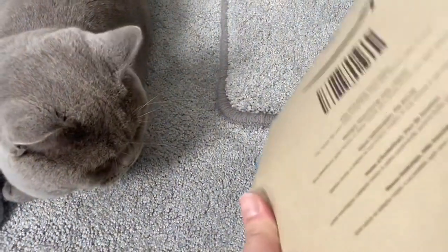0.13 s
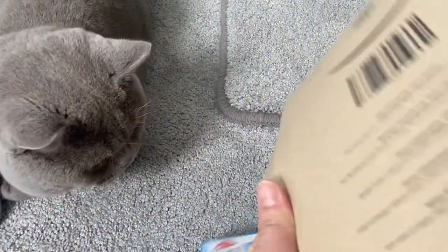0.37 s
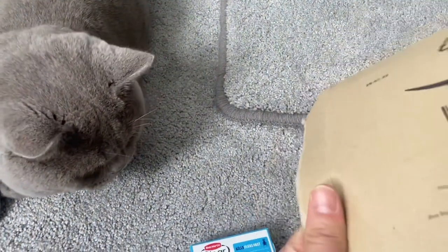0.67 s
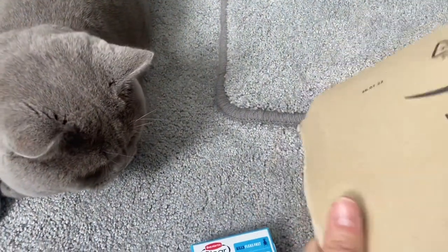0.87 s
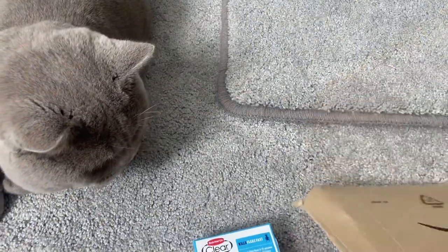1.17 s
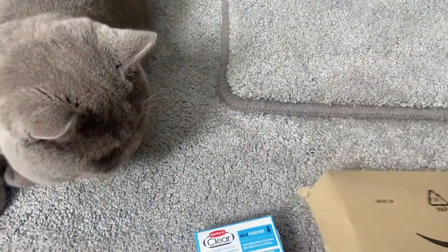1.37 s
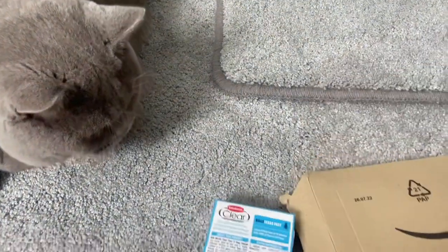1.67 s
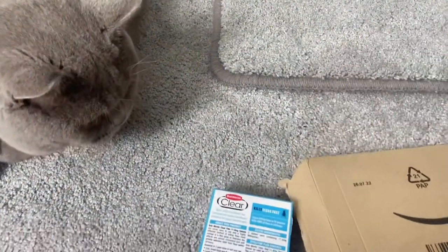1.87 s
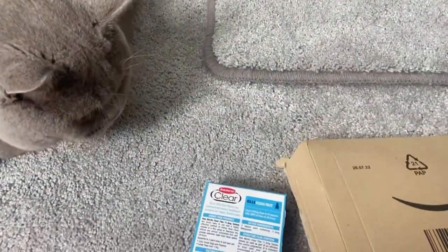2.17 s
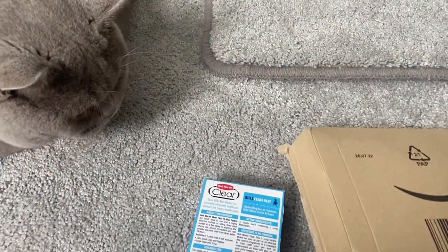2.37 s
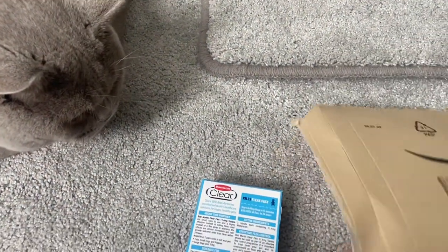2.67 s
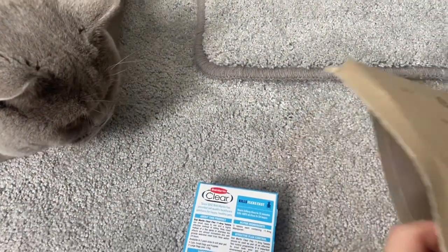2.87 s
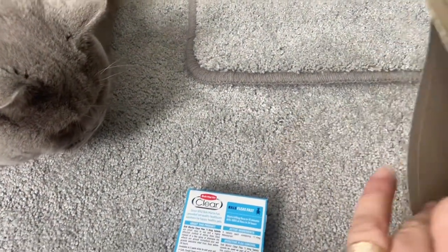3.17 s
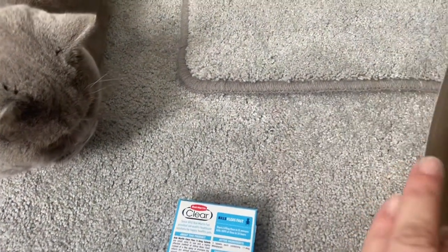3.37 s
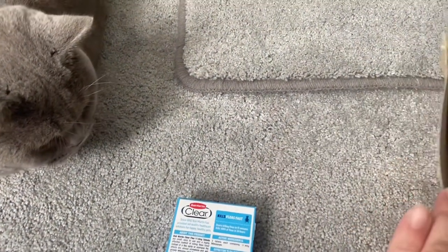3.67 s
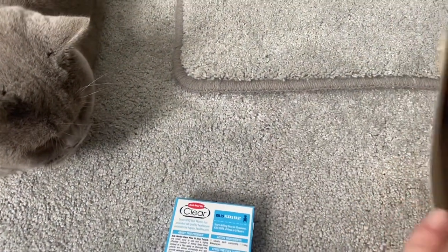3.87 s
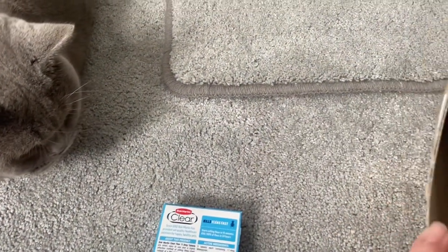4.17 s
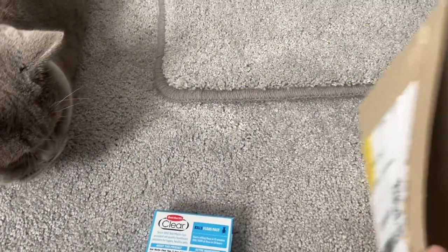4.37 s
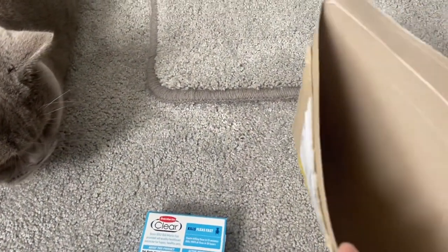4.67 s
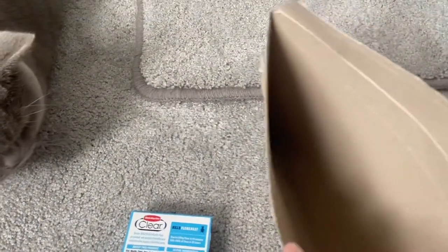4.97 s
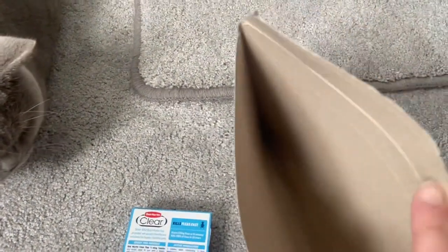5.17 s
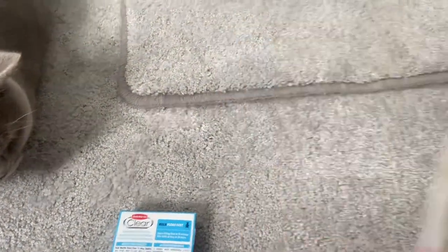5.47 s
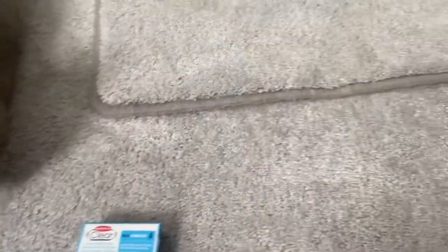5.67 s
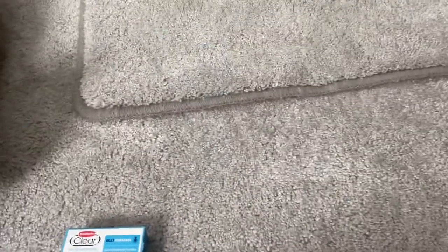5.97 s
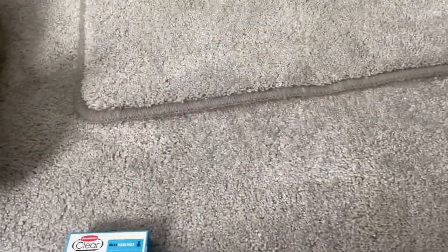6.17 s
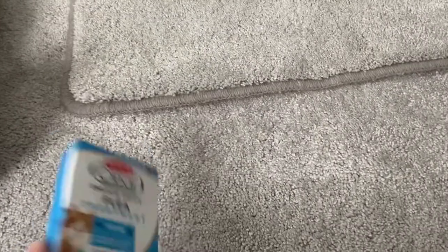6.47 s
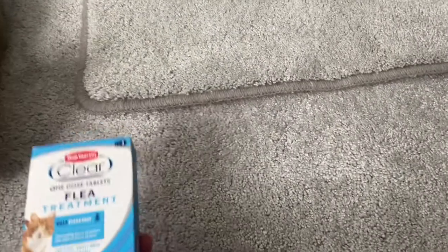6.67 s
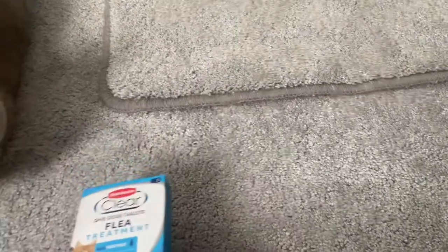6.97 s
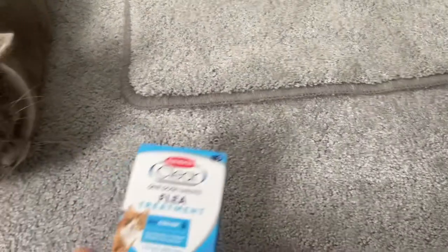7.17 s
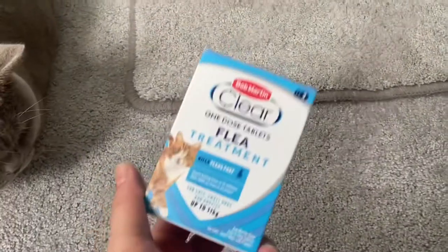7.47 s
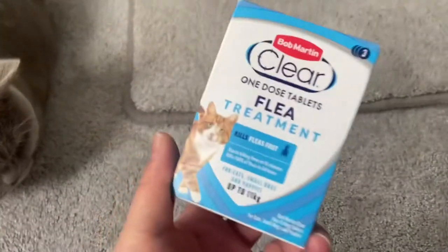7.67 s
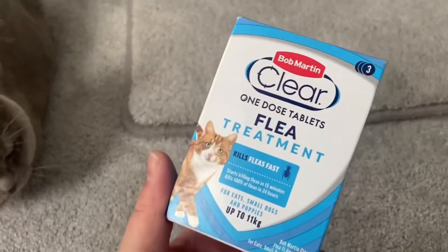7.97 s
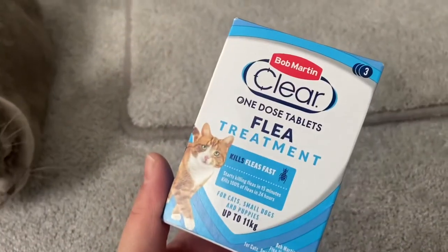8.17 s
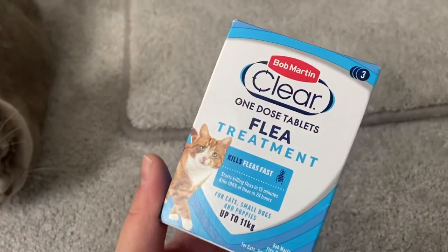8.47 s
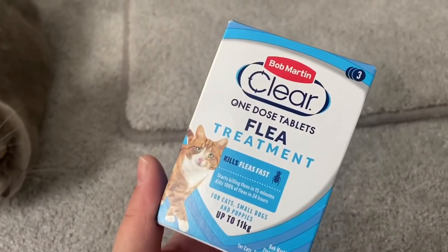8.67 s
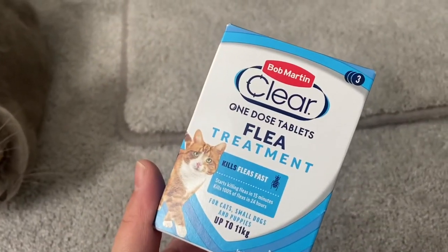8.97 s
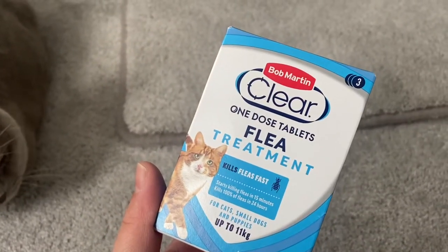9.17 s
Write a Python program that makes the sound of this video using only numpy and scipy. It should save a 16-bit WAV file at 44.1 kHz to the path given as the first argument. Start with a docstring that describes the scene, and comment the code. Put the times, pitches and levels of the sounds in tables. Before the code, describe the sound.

A stiff paper mailer buckles and rustles close by, slides over carpet and lands with a thud, then a small cardboard box is tapped and turned.

```python
"""Quiet, carpeted room: a stiff paper mailer is flexed open close by, slid over carpet, put down with a thud;
then a small cardboard box is picked up and turned in the fingers.
Buckling and taps: clusters of snaps through resonances, plus a bright crack. Rubbing: coloured noise
for hollow body, surface and fibres. Thumps: sagging sines with a dull puff. Behind: low flutter, still air, short tail."""
import sys
import numpy as np
from scipy import signal
from scipy.fft import rfft, irfft, next_fast_len
from scipy.io import wavfile
from scipy.ndimage import uniform_filter1d, map_coordinates

SR = 44100
rng = np.random.default_rng(int(sys.argv[2]) if len(sys.argv) > 2 else 0)


def dump(signal):
    """Clip the signal to [-1, 1] and save it as 16-bit WAV at the path in sys.argv[1]."""
    limited = np.clip(np.atleast_2d(signal).T, -1, 1)
    pcm = np.round(limited * 32767).astype(np.int16)
    wavfile.write(sys.argv[1], SR, pcm)


N = 410994
T = np.arange(N) / SR
BOX_FROM_S = 6.1  # the hand leaves the mailer for the box


def amp(db):
    """Decibels to gain."""
    return 10 ** (np.asarray(db) / 20)


def unit(x):
    """Scaled to rms 1."""
    return x / np.sqrt(np.mean(x ** 2) + 1e-20)


def along(points, hz):
    """(Hz, value) points joined on a log frequency axis."""
    f, v = np.transpose(points)
    return np.interp(np.log(hz + 1), np.log(f + 1), v)


def wobble(rate_hz):
    """Smooth random curve with rate_hz knots a second."""
    knots = rng.standard_normal(int(N * rate_hz / SR) + 4)
    t = np.arange(0, T[-1] + 1 / rate_hz, 1 / (8 * rate_hz))
    return np.interp(T, t, map_coordinates(knots, [t * rate_hz]))


def filtered(x, response):
    """x times a complex response of frequency."""
    n = x.shape[-1]
    m = 2 * next_fast_len(n // 2 + 2048)
    return irfft(rfft(x, m) * response(np.fft.rfftfreq(m, 1 / SR)), m)[..., :n]


def coloured(x, spectrum):
    """x through the minimum-phase filter with this spectrum."""
    def response(hz):
        cepstrum = irfft(np.log(amp(along(spectrum, hz))))
        cepstrum[1:len(hz) - 1] *= 2  # fold onto positive time
        cepstrum[len(hz):] = 0
        return np.exp(rfft(cepstrum))
    return filtered(x, response)


def rung(x, modes, stretch):
    """x through resonances scaled in frequency by stretch; paper damps what lies far above them."""
    damping_hz = 5070

    def response(f):
        total = 0
        for k, (hz, width_hz, db) in enumerate(modes):
            damped = 1j * f * width_hz
            total = total + (-1) ** k * amp(db) * damped / ((hz * stretch) ** 2 - f * f + damped)
        return total / (1 + 1j * f / damping_hz) ** 2
    return filtered(x, response)


def stereo(pair, side_db):
    """Two unrelated signals as middle and side."""
    side = amp(side_db) * pair[1]
    return np.array([pair[0] + side, pair[0] - side]) / np.hypot(1, amp(side_db))


def add(track, s, sound):
    """Mix a sound in at time s."""
    part = track[:, max(0, round(s * SR)):][:, :sound.shape[-1]]
    part += sound[..., :part.shape[-1]]


def friction(spectrum, side_db, grain_db, patchy_db, slip_rate_hz=900):
    """Countless slips of uneven size, as noise of drifting colour; stereo, rms 1."""
    standing_share = 1.1
    slips = rng.standard_normal((2, N)) * amp(grain_db * wobble(slip_rate_hz))
    z = signal.stft(slips, nperseg=1024)[2]
    drift = rng.standard_normal(z.shape[1:])
    drift = uniform_filter1d(uniform_filter1d(drift, size=4, axis=0), size=6, axis=1)
    standing = standing_share * rng.standard_normal((len(drift), 1))  # fine resonances that stay put
    patchy = z * amp(patchy_db * (unit(drift) + standing))
    pair = signal.istft(patchy, nperseg=1024)[1][:, :N]
    return unit(stereo(coloured(pair, spectrum), side_db))


def background(hollow):
    """Uneven low flutter of sheet and hands, growing with the hollow rubbing, over the room's still air."""
    # spectral density of the flutter: f/Hz, level/dB
    flutter_spectrum = [(25, -24.5), (45, 2.5), (120, -4), (260, -16.5), (450, -18.5), (900, -45),
                        (4000, -99.5)]
    # spectral density of the still air: f/Hz, level/dB
    air_spectrum = [(20, -17), (50, 3), (130, -10), (330, -15.5), (550, -11.5), (1000, -22.5),
                    (8000, -32.5), (15000, -43.5)]
    rest_db, handling_db, firm_db = -70, -52, -50.5  # handling_db: added flutter when hollow is at firm_db
    growth_db_per_db, smoothing_s = 0.43, 0.04
    effort = (hollow / amp(firm_db)) ** growth_db_per_db
    effort = np.abs(uniform_filter1d(effort, size=1 + int(smoothing_s * SR)))
    sway = np.hypot(amp(rest_db), amp(handling_db) * effort) * amp(1.2 * wobble(5))
    flutter = sway * friction(flutter_spectrum, side_db=-11, grain_db=1.4, patchy_db=1.2)
    air = coloured(rng.standard_normal((2, N)), air_spectrum)
    return flutter + amp(-75.5) * unit(stereo(air, side_db=-3.5))


def room(x):
    """Short, soft tail of the furnished room: decaying noise, 5 ms late."""
    # decay time: f/Hz, t60/s
    decay = [(700, 0.5), (3000, 0.13), (12000, 0.17)]
    hz, t, z = signal.stft(rng.standard_normal((2, SR // 2)), SR, nperseg=256)
    fading = z * amp(-60 * t / along(decay, hz)[:, None])
    tail = signal.istft(fading, SR, nperseg=256)[1]
    tail = np.pad(stereo(tail, side_db=-5), ((0, 0), (SR // 200, 0)))
    return signal.fftconvolve(x.mean(0)[None], tail / np.linalg.norm(tail[0]), axes=1)[:, :N]


def thumps(attack_s, dull_db):
    """Cushioned pushes: a few low cycles of sagging pitch and a dull puff around the final pitch."""
    # a wall flaps or something lands on the floor: t/s, level/dB ahead of the envelope, final pitch f/Hz
    pushes = [(0.054, -22.5, 124), (.11, -27.5, 125), (0.203, -24.5, 110.1), (.279, -24.5, 112.9),
              (0.907, -37, 106), (1.145, -32, 85.7), (1.283, -27, 68.4), (1.4, -39, 87.4), (2.886, -32, 70),
              (4.358, -36.5, 124.4), (5.033, -38.5, 120), (5.169, -32, 127.5), (5.392, -36, 110.3),
              (5.611, -37.5, 82.4), (5.763, -17.5, 84.1), (5.885, -37.5, 58), (6.523, -18, 86.2),
              (6.612, -33, 95)]
    t60_s, shudder_db, shudder_t60_s = 0.16, -26, 0.38  # a weak shudder outlasts each push
    sharp_share, sag_s = 1.3, 0.0061  # starts this share above its pitch; sag time constant
    track, t = np.zeros((2, N)), np.arange(SR // 3) / SR
    decay = amp(-60 * t / t60_s) + amp(shudder_db - 60 * t / shudder_t60_s)
    shape = decay * (1 - np.exp(-(t / attack_s) ** 2))
    sagging = t + sharp_share * sag_s * (1 - np.exp(-t / sag_s))
    for s, db, hz in pushes:
        noise = rng.standard_normal((2, len(t)))
        puff = filtered(noise, lambda f: (f / hz) ** 2 / (1 + (f / hz) ** 4))
        puff = amp(dull_db) * unit(stereo(puff, side_db=-3.5))
        add(track, s, amp(db) * shape * (np.sin(2 * np.pi * hz * sagging) + puff))
    return track


def snaps(t, length_s, after_db, count):
    """A first snap and the ever smaller ones it sets off within the given length."""
    train = np.zeros(len(t))
    train[0] = 1
    place = (np.arange(count) + rng.random(count)) / count
    sizes = amp(after_db - 1.5 * place) * rng.standard_normal(count)
    np.add.at(train, (place * min(length_s, t[-1]) * SR).astype(int), sizes)
    return train


def flurry(t60_s):
    """A dense, dying run of tiny pulses, energy 1."""
    t = np.arange(int(t60_s * SR)) / SR
    pulses = rng.standard_normal(len(t)) * amp(-60 * t / t60_s)
    return pulses[None] / np.linalg.norm(pulses)


def strikes(events, modes, edge, after_db, scatter_db, side_db, taut):
    """Snap clusters, scattered by the stiff sheet, ring a body and crack; if taut, tension shifts the crack too."""
    scatter_t60_s, spray_t60_s = .017, .007
    track, t = np.zeros((2, N)), np.arange(SR // 16) / SR
    for s, body_db, edge_db, length_s, stretch in events:
        train = snaps(t, length_s, after_db, count=1 + int(length_s * 500))
        scatter = rng.standard_normal((2, len(t))) * amp(-60 * t / scatter_t60_s)
        scatter *= amp(scatter_db) / np.linalg.norm(scatter[0])
        scatter[0, 0] += 1  # direct path
        force = signal.fftconvolve(scatter, train[None], axes=1)[:, :len(t)]
        force = stereo(force, side_db)
        body = unit(rung(force, modes, stretch))

        # a crack is a brief spray of breaking fibres, duller when gentler
        spray = signal.fftconvolve(force, flurry(spray_t60_s), axes=1)[:, :len(t)]
        colour = [(hz * stretch if taut else hz, db) for hz, db in edge]
        corner_hz = 13000 * np.exp((edge_db + 39.5) / 24)
        crack = filtered(coloured(spray, colour),
                         lambda f: 1 / (1 + 1.4j * f / corner_hz - (f / corner_hz) ** 2))

        spread = np.sqrt(length_s / t[-1])  # levels refer to the cluster's length
        add(track, s, spread * (amp(body_db) * body + amp(edge_db) * unit(crack)))
    return track


def box_taps():
    """Fingers knock and catch on the box: its body rings and its card clicks."""
    # taps: knocks on the face ring low, fingers scraping along the box ring higher: t/s, body level/dB, click
    # level/dB, length/s, factor on the resonances
    taps = [(6.175, -46.5, -48, 0.0039, 0.56), (6.195, -49.5, -47, 0.029, 1.33),
            (6.257, -44.5, -73.5, 0.0054, 1.03), (6.273, -48.5, -75, 0.0087, 1.0),
            (6.3888, -23.5, -31.5, 0.0019, 1.11), (6.3962, -31, -47, 0.0015, 1.65),
            (6.408, -43, -58, 0.0024, 1), (6.4165, -37, -56.5, 0.002, 1.36),
            (6.427, -38, -50, 0.0039, 1.05), (6.473, -32.5, -31, 0.0038, 0.88),
            (6.498, -32.5, -48.5, 0.0059, 1.72), (6.52, -35.5, -53.5, 0.0043, 0.7),
            (6.589, -39, -67, 0.0025, 1.4), (7.283, -72, -87.5, 0.05, 1.47), (7.348, -60, -59, 0.026, 1.06),
            (7.391, -51, -63, 0.042, 1.4), (7.457, -54, -66, 0.006, 1.2), (7.506, -45, -40, 0.0038, 1.03),
            (8.135, -70.5, -94, 0.005, 0.91), (8.51, -62.5, -73.5, 0.0057, 0.93),
            (8.666, -67.5, -78, 0.0058, 0.91)]
    # box resonances: f/Hz at factor 1, width/Hz, level/dB
    box_modes = [(695, 210, 3), (960, 184, -2), (1160, 211, -8)]
    # spectral density of the click: f/Hz, level/dB
    click = [(500, -14.5), (1700, -17.5), (2700, 12.5), (3500, -6), (4500, -2), (6500, 1), (15000, -26)]
    return strikes(taps, box_modes, click, after_db=-6.0, scatter_db=-11, side_db=-5, taut=False)


def contact():
    """Gains of rasp, hollow body and hiss: strokes set in, swell or sag, and let go; scuffs are short swells."""
    # the hand slides paper, then card, over carpet and skin: t/s, length/s, rasp level/dB at mid-stroke,
    # swell start to end/dB, hollow body over rasp/dB, fibre hiss over rasp/dB
    strokes = [(0.029, 0.33, -53.5, -5.5, 4.5, -7.5), (0.393, 0.15, -64, -24, 0, -8.5),
               (0.766, .14, -52, 11.5, -6, -6.5), (1.076, 0.34, -56.5, -8, -1.5, -4.5),
               (1.47, 0.19, -63, 0, -3.5, -2.5), (2.079, 0.054, -64.5, -0.5, -12, -3.5),
               (2.207, 0.093, -65.5, 2.5, -8.5, 0), (2.398, 0.17, -62.5, 5, -2, -9),
               (2.576, 0.26, -56.5, -1.5, -7, -6.5), (2.889, 0.39, -58.5, -6, -6, -3.5),
               (3.391, 0.12, -60.5, -7, -9, 0), (3.542, 0.078, -64, 3.5, -7, 1.5),
               (3.735, .23, -57.5, 2.5, -1, 3), (4.013, 0.29, -61.5, 12, -2.5, -4),
               (4.292, 0.075, -48, -4, -2, -5.5), (4.435, 0.44, -87, -0.5, 8.5, -2),
               (4.898, 0.11, -67, 14.5, -3, -0.5), (5.012, 0.17, -54, 1.5, -2, -5.5),
               (5.187, 0.25, -49, -3.5, -6, -2.5), (5.521, 0.089, -56.5, 9, -3, -1.5),
               (5.903, 0.23, -66.5, -0.5, -4, 2.5), (6.176, 0.389, -65, -7, 4.5, -3.5),
               (6.361, 0.093, -56.5, -3.5, 2, -0.5), (6.478, 0.069, -47.5, 0.5, 0, -10),
               (6.583, 0.16, -70, -13.5, 11, -2.5), (6.848, 0.286, -76.5, 7, -40, -9),
               (7.365, 0.23, -70.5, -2, 3, -0.5), (7.666, 0.21, -86.5, -18, 15.5, -0.5)]
    # an edge catches: t/s, peak rasp level/dB, hollow body over rasp/dB, fibre hiss over rasp/dB, rise/s
    scuffs = [(1.18, -51.5, 1, -6, 0.016), (2.908, -59, 2, -6, 0.014), (3.814, -49, -1.5, -1, 0.016),
              (5.185, -41.5, -3.5, -7.5, 0.013), (5.39, -34.5, -6.5, -7, 0.0034),
              (5.604, -42.5, -1.5, 1.5, 0.0082), (5.765, -63.5, -8, 4, 0.0068), (5.972, -63, 3, -18, 0.013),
              (6.68, -55, 5, -6.5, 0.0091)]
    grab_db_per_s, release_db_per_s = 477, 354.5
    settle_db, settle_db_per_s = -13.5, 88  # faint rustle after each stroke
    fall_over_rise = 1.8
    t = T[::32]
    power = np.zeros((3, len(t)))
    for s, length_s, db, swell_db, hollow_db, hiss_db in strokes:
        before, after = np.maximum(s - t, 0), np.maximum(t - s - length_s, 0)
        hold = db + swell_db * (np.clip((t - s) / length_s, 0, 1) - .5)
        release = np.maximum(-release_db_per_s * after, settle_db - settle_db_per_s * after)
        gain = amp(hold - grab_db_per_s * before + release)
        power += np.outer(amp([0, hollow_db, hiss_db]), gain) ** 2
    for s, db, hollow_db, hiss_db, rise_s in scuffs:
        width_s = np.where(t < s, rise_s, fall_over_rise * rise_s)
        swell = amp(db) * np.exp(-((t - s) / width_s) ** 2 / 2)
        power += np.outer(amp([0, hollow_db, hiss_db]), swell) ** 2
    return [np.interp(T, t, gain) for gain in np.sqrt(power)]


def catches(rate_hz):
    """Single fibres catch and let go: sparse pinpoint snaps, rms 1."""
    return unit(rng.standard_normal(N) * (rng.random(N) < rate_hz / SR))


def flexed(x, factors):
    """Bending slides a colour up and down: x is read at a varying, wavering speed."""
    factor = np.interp(T, *np.transpose(factors)) * np.exp(.06 * wobble(12))
    place = np.cumsum(factor) % (N - 1)
    return np.array([np.interp(place, np.arange(N), side) for side in x])


def rubbing(rasp, hollow, hiss):
    """Sliding excites a hollow body, its surface and its fibres together: first the mailer, then the box."""
    # spectral densities of mailer body, box body, paper rasp, card rasp, fibre hiss: f/Hz, level/dB
    mailer_body = [(120, -18.5), (300, -4), (460, -1.5), (680, 6.5), (900, -1), (1400, -6.5), (2400, -24),
                   (6000, -64)]
    box_body = [(120, -12), (280, 4), (470, -3), (700, 2), (930, -3), (1250, -2), (1900, -21.5),
                (2700, -7.5), (6000, -52)]
    paper_rasp = [(400, -21), (1100, 0.5), (1500, -2), (2300, 0.5), (3900, -0.5), (4800, -4), (7000, -25.5),
                  (16000, -71.5)]
    card_rasp = [(700, -25.5), (1400, -2), (4200, 1.5), (5400, -6.5), (9000, -30)]
    fibre_hiss = [(2000, -30.5), (4800, -2.5), (7500, -1.5), (10000, -5.5), (12500, -13), (15000, -27.5)]
    # the sheet's resonance: f/Hz at factor 1, width/Hz, level/dB
    sheet_mode = [(2000, 380, 0)]
    # the hollow is pitched higher when pressed flat: t/s, factor on its spectrum
    flatten = [(0.298, 1.11), (1.601, 1.0), (2.6, 1.4), (3.1, 1.08), (3.8, 0.92), (5.3, 1.0), (5.6, 1.75),
               (6.041, 1.94)]
    # the sheet sings higher the more it is bent: t/s, factor on its resonance
    bend = [(0.88, 1.45), (1.15, 0.95), (2.62, 1.08), (2.8, 1.4), (2.95, 0.85), (3.8, 0.7), (4.08, 1.2),
            (4.3, 1.25), (5.2, 0.75), (5.3, 1.4)]
    catch_db, sheet_db = -8, -4.5  # over the smooth slips; over the plain rasp
    on_mailer = T < BOX_FROM_S

    mailer = friction(mailer_body, side_db=-10.0, grain_db=2.5, patchy_db=3.0, slip_rate_hz=410)
    box = friction(box_body, side_db=-7.5, grain_db=1.5, patchy_db=2, slip_rate_hz=150)
    body = np.where(on_mailer, flexed(mailer, flatten), box)

    paper = friction(paper_rasp, side_db=-5, grain_db=2.8, patchy_db=3.3)
    paper = unit(paper + amp(catch_db) * unit(coloured(catches(rate_hz=220), paper_rasp)))
    singing = unit(flexed(rung(paper, sheet_mode, 1), bend))
    paper = unit(paper + amp(sheet_db) * singing)
    card = friction(card_rasp, side_db=-6, grain_db=2, patchy_db=2)
    surface = np.where(on_mailer, paper, card)

    fibres = friction(fibre_hiss, side_db=-6, grain_db=2.2, patchy_db=2.8)
    grip = amp(1.4 * wobble(70))  # the contact tightens and loosens
    return grip * (hollow * body + rasp * surface + hiss * fibres)


def creases(rasp, hollow, count):
    """Rows like the crinkles', at random moments: denser and stronger the harder the mailer is rubbed."""
    body_db, edge_db, spread_db, length_s = 3, 1, 3.5, .0015  # body and crackle over the rubbing
    place, size, tension = rng.random(count), rng.standard_normal(count), rng.standard_normal(count)
    strain = np.cumsum(hollow * (T < BOX_FROM_S))
    at = np.searchsorted(strain, (np.arange(count) + place) / count * strain[-1])

    def level_db(gain):
        return 20 * np.log10(gain[at] + 1e-9) + spread_db * size
    return np.column_stack([at / SR, level_db(hollow) + body_db, level_db(rasp) + edge_db,
                            np.full(count, length_s), 1.15 * np.exp(0.25 * tension)])


def mailer_crinkles(rasp, hollow):
    """The mailer's walls buckle and tiny creases give way: the hollow rings and the paper crackles."""
    # buckling: t/s, body level/dB, crackle level/dB, length/s, tension as a factor on the resonances
    crinkles = [(0.004, -32, -53, 0.02, 1.05), (0.0348, -17.5, -34, 0.0017, 1.19),
                (0.04, -17.5, -41.5, 0.0012, 0.97), (0.0445, -23, -45, 0.006, 0.98),
                (0.0535, -35, -35, 0.0051, 1.55), (0.0595, -26, -36.5, 0.0031, 1.1),
                (0.0828, -26, -35.5, 0.0027, 0.86), (0.098, -27.5, -41, 0.0058, 0.98),
                (0.103, -27.5, -32, 0.0059, 1), (0.13, -29.5, -37.5, 0.0039, 1.15),
                (0.16, -39, -45, 0.014, 1.7), (0.2005, -25.5, -40, 0.0022, 0.95),
                (0.222, -24, -39.5, 0.0059, 1.06), (0.2765, -29.5, -35.5, 0.00099, 0.92),
                (0.377, -34, -54, 0.0062, 1.15), (0.382, -27, -36.5, 0.0055, 1.1),
                (0.769, -46.5, -50.5, 0.0037, 1.42), (0.911, -38, -40.5, 0.0054, 1.44),
                (1.13, -46, -53, 0.021, 0.83), (1.403, -38.5, -60, 0.0051, 0.61),
                (1.601, -45.5, -73.5, 0.009, 0.474), (1.6295, -42, -68.5, 0.0026, 0.98),
                (3.802, -44.5, -46, 0.016, 0.8), (4.048, -57.5, -55, 0.0076, 1.14),
                (4.211, -52.5, -50, 0.01, 1.12), (4.283, -64, -43.5, 0.0073, 1.24),
                (4.599, -43.5, -57.5, 0.0015, 0.9), (4.675, -57.5, -75, 0.0037, 1.03),
                (4.81, -55, -81, 0.0032, 0.88), (5.0305, -26.5, -52, 0.0009, 0.88),
                (5.389, -35, -34.5, 0.0054, 0.94)]
    # mailer resonances: f/Hz at factor 1, width/Hz, level/dB
    mailer_modes = [(184, 34, 2), (380, 58, 1.5), (454, 68, -2.5), (690, 265, 4), (840, 180, 4.5),
                    (1090, 200, -5.5), (1337, 100, -1.5), (2087, 1000, -16)]
    # spectral density of the crackle: f/Hz at factor 1, level/dB
    crackle = [(500, -20), (1300, -2), (2000, 9), (3200, -1), (5000, -4.5), (9000, -13), (14000, -42.5)]
    events = [*crinkles, *creases(rasp, hollow, count=110)]
    return strikes(events, mailer_modes, crackle, after_db=-4.0, scatter_db=-6, side_db=-5.5, taut=True)


def placed(x):
    """The port nearer to the hand hears it earlier and louder."""
    # the mailer leaves to the right, the box comes in from the left: t/s, lead of the left port/ms
    bearing = [(5.42, 0), (5.58, -.25), (5.95, -.2), (6.15, 0.18), (6.55, .21), (7.4, .09), (8.2, 0.02)]
    near_db_per_ms = 15  # level difference between the ports
    lead_ms = np.interp(T, *np.transpose(bearing))
    shift = lead_ms * SR / 1000  # samples
    return np.array([amp(half * near_db_per_ms * lead_ms) * map_coordinates(side, [np.arange(N) + half * shift])
                     for side, half in zip(x, (.5, -.5))])


def scene():
    """Mailer and box close by, with the room behind them."""
    rasp, hollow, hiss = contact()
    hits = mailer_crinkles(rasp, hollow) + box_taps()
    rub = rubbing(rasp, hollow, hiss)
    low = thumps(attack_s=.01, dull_db=-9)
    tail = room(amp(-13) * hits + amp(-22.0) * rub + amp(-17.0) * low)
    return placed(hits + rub) + low + tail + background(hollow)


def record(dry):
    """Two microphone ports: narrower image and out-of-step phase in the treble, nothing above the band limit."""
    # phase between the ports: f/Hz, lead of the left/rad
    port_phase = [(700, .15), (2000, -.3), (6500, .2), (7400, -.5), (9000, -3.1), (12300, -7.2),
                  (14500, -12.3)]
    top_hz = 15700
    mid = dry.mean(0)
    side = filtered(dry[0] - mid, lambda hz: amp(along([(5200, 1), (7600, -19.5)], hz)))  # f/Hz, gain/dB

    def ports(hz):
        return np.exp(.5j * np.outer([1, -1], along(port_phase, hz))) * (hz < top_hz)
    return filtered(np.array([mid + side, mid - side]), ports)


dry = scene()
out = record(dry)
dump(out)
```